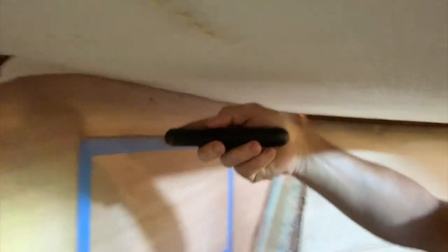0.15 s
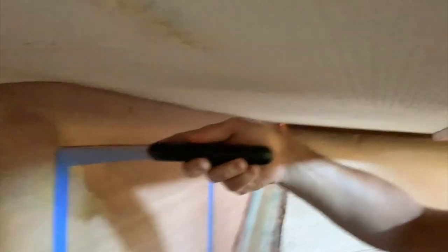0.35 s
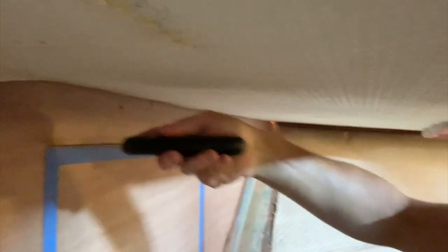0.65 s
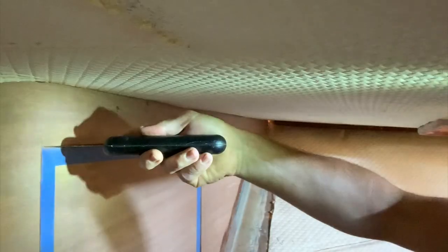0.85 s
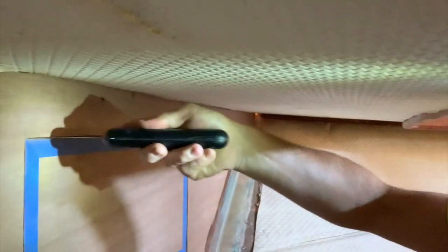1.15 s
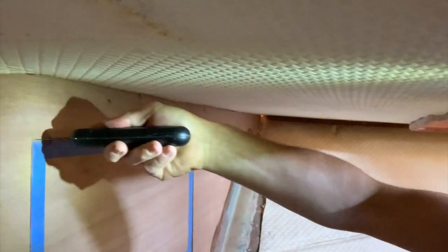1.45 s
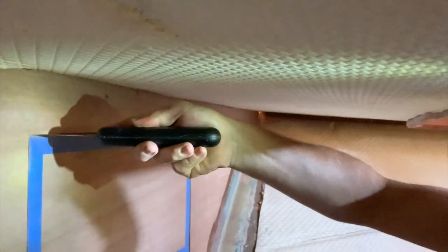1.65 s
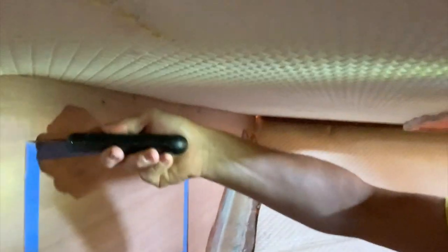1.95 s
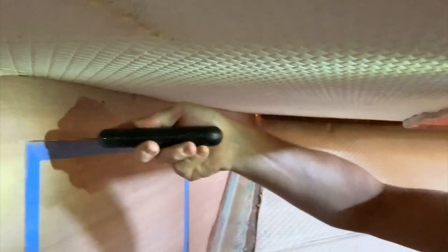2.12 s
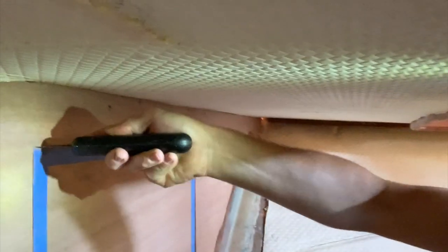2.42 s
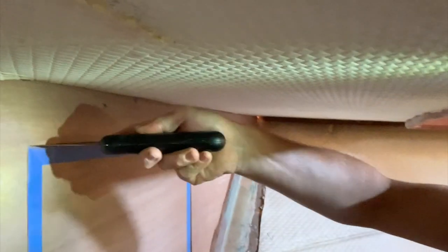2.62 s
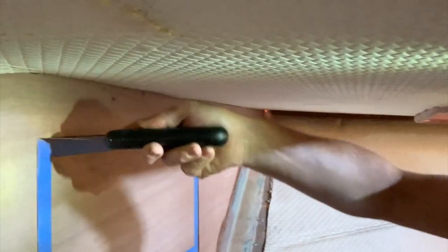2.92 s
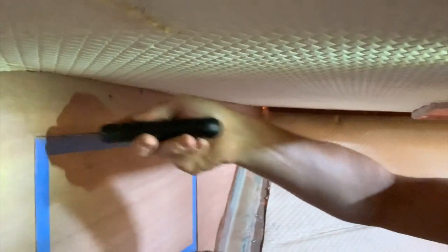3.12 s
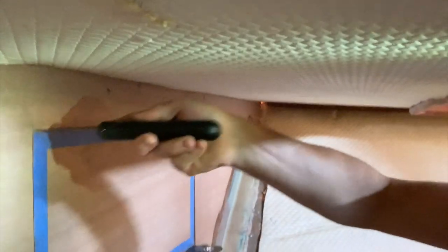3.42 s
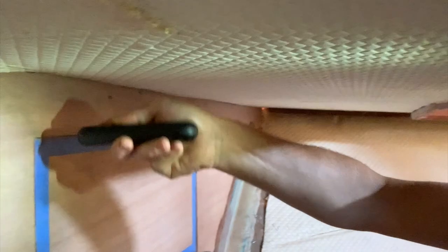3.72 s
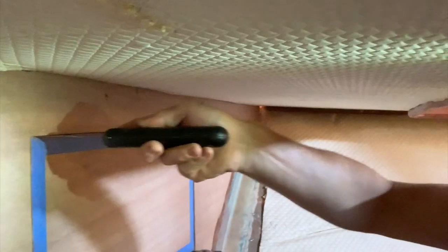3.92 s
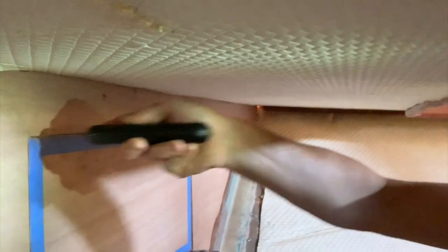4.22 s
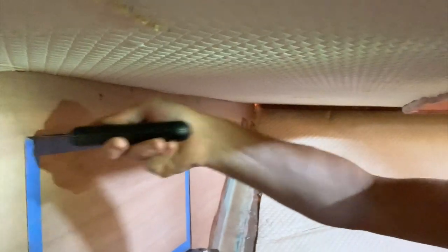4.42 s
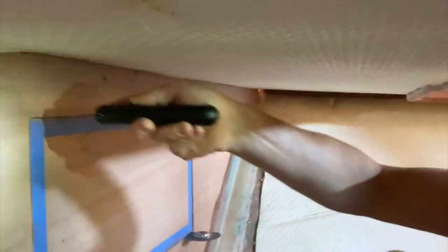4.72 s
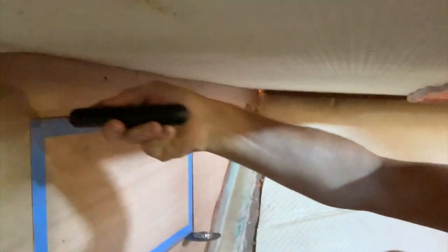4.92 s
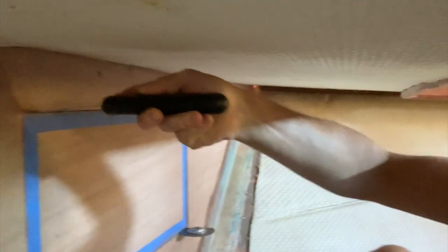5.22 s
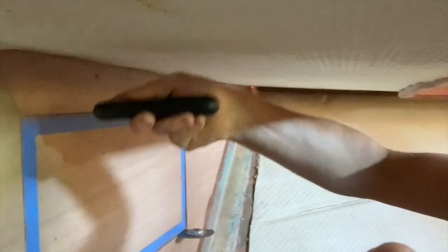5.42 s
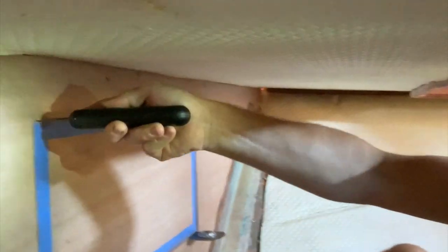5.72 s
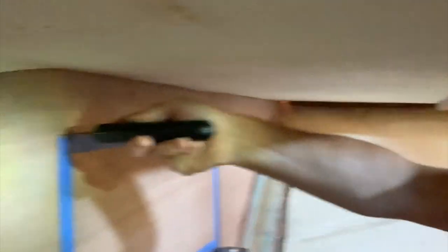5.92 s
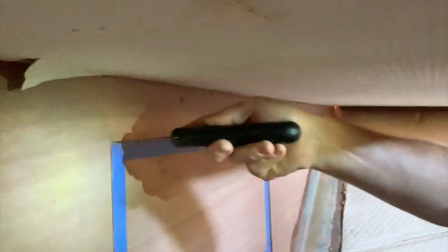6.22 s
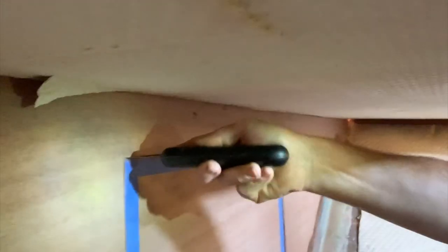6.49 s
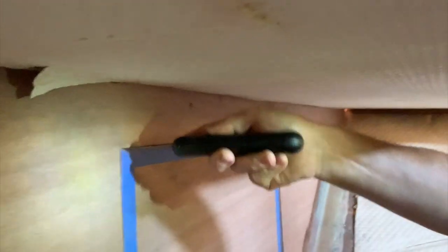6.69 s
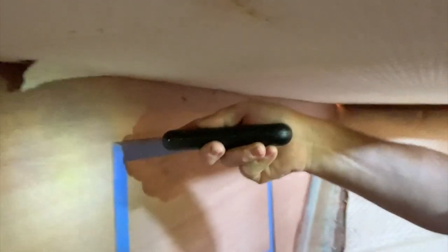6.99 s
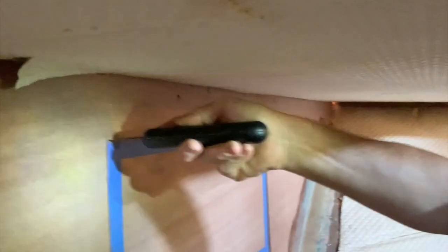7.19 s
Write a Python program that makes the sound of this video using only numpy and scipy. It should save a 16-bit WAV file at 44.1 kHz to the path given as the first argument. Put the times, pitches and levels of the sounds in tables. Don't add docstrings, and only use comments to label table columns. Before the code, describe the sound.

In a small, boxy boat cabin, a fine-toothed pull saw cuts a thick wooden bulkhead close to the microphone. Soft hesitant strokes quicken into strong, regular rasps, each with a hollow woody boom and a dry hiss. A sharp tick marks a short pause, then faster sawing, another quiet pause, and steady strokes to the end.

```python
import sys
import numpy as np
from scipy import signal
from scipy.fft import rfft, irfft, next_fast_len
from scipy.io import wavfile
from scipy.ndimage import uniform_filter1d

SR = 44100
rng = np.random.default_rng(int(sys.argv[2]) if len(sys.argv) > 2 else 0)


def inscribe(sig):
    pcm = np.round(np.clip(np.atleast_2d(sig).T, -1, 1) * 32767)
    wavfile.write(sys.argv[1], SR, pcm.astype(np.int16))


def nominal_scale(level):
    x = np.asarray(level, float) / 20
    return 10 ** x


N = 324135
HZ = np.fft.rfftfreq(next_fast_len(N + SR), 1 / SR) + 1e-3


def rms_one(x):
    return x / np.sqrt(np.mean(x ** 2) + 1e-20)


def through(x, response):
    size = 2 * (len(HZ) - 1)
    return irfft(rfft(x, size) * response, size)[:N]


def modes(table):
    total = 0
    for k, (hz, width, db) in enumerate(table):
        damping = 1j * HZ * width
        total = total + (-1) ** k * nominal_scale(db) * damping / (hz ** 2 - HZ ** 2 + damping)
    return total


def colour(points):
    hz, db = np.transpose(points)
    cep = irfft(np.log(nominal_scale(np.interp(np.log(HZ), np.log(hz), db))))
    half = len(cep) // 2
    cep[1:half] *= 2
    cep[half + 1:] = 0
    return np.exp(rfft(cep))


def drift(rate):
    r = np.exp(-2 * np.pi * rate / SR)
    wander = signal.lfilter([1], [1, -2 * r, r * r], rng.standard_normal(N + SR))
    return rms_one(wander[SR:])


def held(x, level_db, span_s):
    size = max(int(span_s * SR), 64)
    power = uniform_filter1d(uniform_filter1d(x ** 2, size), size)
    return x * nominal_scale(level_db) / np.sqrt(power + 1e-14)


def grains(per_s, spread_db):
    sizes = nominal_scale(spread_db * np.minimum(rng.exponential(1, N), 5)) * rng.choice([-1, 1], N)
    return rms_one(sizes * (rng.random(N) < per_s / SR))


def cabin():
    t60_s, echoes_db = 0.14, 6
    lags = rng.uniform(.007, .03, 20)
    echoes = 0
    for k, lag in enumerate(lags):
        loop = nominal_scale(-60 * lag / t60_s) * np.exp(-2j * np.pi * HZ * lag)
        echoes = echoes + (-1) ** k * loop / (1 - loop)
    return 1 + nominal_scale(echoes_db) * echoes / np.sqrt(len(lags))


def cabin_floor():
    # frequency in Hz, density in dB per Hz
    floor_colour = [(76, -22), (130, -1), (194, 3), (340, -7), (632, -21), (1380, -33), (2470, -37),
                    (15600, -59)]
    return nominal_scale(-50) * rms_one(through(rng.standard_normal(N), colour(floor_colour)))


def jolts(boom_db):
    # centre of the jolt in seconds, level in dB
    arm_jolts = [(.14, -31), (.26, -28), (.59, -29.5), (0.799, -27.5), (1.08, -31), (1.311, -34),
                 (1.559, -23), (1.681, -24), (1.79, -26), (2.27, -28), (2.6, -33), (2.679, -27),
                 (2.76, -26.5), (3.07, -25), (3.321, -31), (3.53, -23.5), (3.721, -24.5), (3.93, -21),
                 (4.35, -26), (5.1, -23.5), (5.3, -31), (5.45, -28.5), (5.6, -22), (5.82, -24),
                 (6.28, -28.5), (6.47, -39), (6.57, -36), (6.88, -30), (7.25, -26)]
    swell_s, rest_db, under_boom_db = 0.034, -39, -14.5
    t = np.arange(N) / SR
    swells = sum(nominal_scale(db) ** 2 * np.exp(-((t - s) / swell_s) ** 2) for s, db in arm_jolts)
    return 10 * np.log10(swells + nominal_scale(rest_db) ** 2 + nominal_scale(boom_db + under_boom_db) ** 2)


def hull(hum_db):
    # mode in Hz, width in Hz, level in dB
    hull_modes = [(43.4, 11.9, -0.5), (52.7, 15.2, 2.5), (65.3, 17.9, -8.5)]
    low_cut = HZ ** 2 / (HZ ** 2 + 36 ** 2)
    push = rng.standard_normal(N) * nominal_scale(hum_db)
    return held(through(push, modes(hull_modes) * low_cut), hum_db, span_s=0.044)


def ticks(room):
    # start in seconds, peak in dB, rattle t60 in seconds, top frequency in Hz (low is a soft contact)
    contacts = [(.091, -38, 0.12, 1500), (.42, -49, .1, 5000), (1.3214, -36, 0.086, 4000),
                (2.7255, -27, .12, 3502), (2.842, -18, 0.16, 15000), (2.937, -37, .1, 3020),
                (3.011, -29, 0.12, 5000), (5.207, -59, 0.029, 19000), (5.2892, -68, 0.094, 7990),
                (5.41, -52, 0.14, 5000), (5.4212, -54, .12, 3992), (5.9437, -86, 0.067, 3944)]
    # frequency in Hz, density in dB per Hz
    contact_colour = [(300, -44), (700, -10), (1500, -8), (2500, -4.5), (4000, -11), (7000, -11.5),
                      (12500, -14), (15600, -16)]
    out, t = np.zeros(N + SR), np.arange(SR // 4) / SR
    for s, db, t60, top_hz in contacts:
        crack = nominal_scale(-60 * t / 0.0053)
        burst = nominal_scale(-2.5 - 60 * t / 0.033)
        rattle = nominal_scale(-12.0 - 60 * t / t60)
        noise = rng.standard_normal(len(t)) * (crack + burst + rattle)
        softened = signal.sosfilt(signal.butter(1, top_hz, fs=SR, output="sos"), noise)
        first = round(s * SR)
        out[first:first + len(t)] += nominal_scale(db - 2.0) * softened
    return through(out[:N], colour(contact_colour) * (1 + nominal_scale(-6.5) * (room - 1)))


def strokes():
    # bite in seconds, time to full speed in seconds,
    # panel boom in dB, fibre hiss in dB, top tooth rate in Hz
    first_strokes = [(.122, .02, -33.5, -44, 115), (.2, .025, -23, -38, 166.7),
                     (0.527, 0.09, -31, -48.5, 134), (0.678, 0.094, -28, -50, 134.8),
                     (.94, .04, -33, -47.5, 130), (1.01, 0.033, -26, -43, 202.8),
                     (1.195, 0.061, -21.5, -42, 300.4), (1.33, .06, -17.5, -41.5, 190),
                     (1.527, 0.066, -14.5, -31, 170.2), (1.755, 0.067, -17, -40, 213.3),
                     (2.015, 0.0637, -16, -32.5, 223.1), (2.232, .15, -16.5, -38.5, 241.3),
                     (2.503, .05, -15.5, -31.5, 261.4), (2.728, .015, -30.5, -52, 112)]
    middle_strokes = [(3.011, .03, -25, -52, 118.7), (3.16, .04, -17.5, -37.5, 305.1),
                      (3.377, .08, -18.5, -33.5, 240), (3.587, 0.058, -18, -36.5, 221.1),
                      (3.79, 0.053, -17.5, -32, 238.3), (4.005, 0.0992, -18, -32.5, 270.5),
                      (4.21, 0.052, -15.5, -31, 335.6), (4.411, 0.03464, -14.5, -33.5, 362.2),
                      (4.592, 0.052, -14.5, -31.5, 218.7), (4.789, 0.048, -17.5, -35.5, 208),
                      (4.99, 0.043, -19, -31, 216.9)]
    last_strokes = [
        (5.425, 0.086, -23.5, -43.5, 225.2),
        (5.599, .06, -21, -43.5, 187.6),
        (5.955, 0.0697, -20, -40.5, 200),
        (6.272, 0.059, -19, -39.5, 250.1),
        (6.547, 0.055, -15, -37.5, 188.7),
        (6.761, 0.04, -18, -38, 237.1),
        (6.95, 0.053, -16, -36, 235),
        (7.159, 0.031, -17, -38.5, 213.1),
        (7.332, 0.033, -17.5, -37.5, 196.6),
    ]
    # stop in seconds, braking time in seconds, panel boom in dB
    stops = [(0, .05, -44), (.34, .14, -57), (.885, .11, -37), (1.129, .08, -33.5), (1.505, .055, -32),
             (1.722, .085, -50), (1.97, .09, -40), (2.465, .07, -32), (2.7, .1, -36), (2.84, .13, -48),
             (3.111, .07, -36), (3.971, .1, -36), (4.38, .07, -32), (4.565, .09, -40), (4.752, .08, -32),
             (4.957, .085, -36), (5.22, .14, -48), (5.915, .14, -46), (6.232, .08, -36), (6.522, .11, -38),
             (6.722, .08, -32), (6.922, .085, -38)]
    glides = [.2, .68, 1.01, 1.33, 5.6]
    eased_bites = [.94, 1.195, 2.232, 3.16, 4.005, 4.21, 4.789, 4.99, 5.425, 5.955, 6.272]
    lead_s, shortest_creep_s, longest_creep_s = .008, .02, .05
    bite_s, eased_bite_s, usual_brake_s = 0.015, .035, .085
    creep_speed, bite_speed, glide_in_speed, glide_out_speed = .3, .65, .85, .85
    rows, t = np.array(first_strokes + middle_strokes + last_strokes), np.arange(N) / SR
    stop, braking, nudge_db = np.transpose(stops)

    bite = rows[:, 0] - lead_s
    rest_s = bite - stop[np.clip(np.searchsorted(stop, bite) - 1, 0, None)]
    short_rest = rest_s < .1
    creep_s = np.where(short_rest, np.clip(rest_s, shortest_creep_s, longest_creep_s), shortest_creep_s)
    start = bite - creep_s
    turn = np.append(start[1:], start[-1] + .2)

    next_stop = np.clip(np.searchsorted(stop, bite + .03), 0, len(stop) - 1)
    early = (stop[next_stop] > start) & (stop[next_stop] < turn + .01)
    end = np.where(early, stop[next_stop], turn)
    brake_s = np.where(early, braking[next_stop], usual_brake_s)
    glides_in = np.abs(rows[:, :1] - glides).min(axis=1) < .02
    eased = np.abs(rows[:, :1] - eased_bites).min(axis=1) < .02
    glides_out = np.append(glides_in[1:], False)

    k = np.clip(np.searchsorted(start, t) - 1, 0, None)
    age, left = t - bite[k], end[k] - t
    rise = np.clip(rows[k, 1], .005, None)

    grip = np.clip(.5 + age / np.where(eased, eased_bite_s, bite_s)[k], 0, 1)
    creep = creep_speed * np.clip(1 + age / creep_s[k], 0, 1) + (1 - creep_speed) * grip
    entry_speed = np.where(glides_in[k], glide_in_speed, bite_speed)
    up = 1 - (1 - entry_speed) * np.clip(1 - age / rise, 0, 1) ** .9
    up = up * np.where(glides_in[k], 1, creep)
    brake = np.clip(left / brake_s[k], 0, 1) ** .8
    brake = np.where(glides_out[k], glide_out_speed + (1 - glide_out_speed) * brake, brake)
    sag = 1 - .3 * np.clip((age - rise) / (age + left - rise), 0, 1)

    resting = (left < 0) | ((age < 0) & short_rest[k]) | (t < start[0])
    nudge = nominal_scale(nudge_db[np.clip(np.searchsorted(stop, t) - 1, 0, None)]) * resting
    rest_db = 20 * np.log10(uniform_filter1d(nudge, size=1000) + nominal_scale(-67))
    speed = np.clip(up * sag * brake, 0, 1)
    progress = np.clip(age / (age + left), 0, 1)
    return speed, progress, rows[k].T, rest_db


def follow(speed, full_db, power, ring, tail_s, rest_db):
    r = np.exp(-1 / (tail_s * SR + 1))
    energy = (nominal_scale(full_db) * speed ** power) ** 2
    ringing = signal.lfilter([1 - r], [1, -r], energy)
    return 10 * np.log10((1 - ring) * energy + ring * ringing + nominal_scale(rest_db) ** 2)


def tooth_phase(rate_hz, jitter):
    return 2 * np.pi * np.cumsum(rate_hz * np.exp(jitter * drift(38.84))) / SR


def panel(phase, boom_db, steep_db):
    # mode in Hz, width in Hz, level in dB
    panel_modes = [(103, 40.1, -2), (122.6, 32.3, -1), (154.9, 14, -11.5), (181.85, 8.44, -1.5),
                   (227.1, 8.2, -2), (287.9, 20, -8), (334.2, 8.2, -1.5), (386.4, 15, -3.5),
                   (408.3, 45, -13)]
    split_hz = 265
    tooth = nominal_scale(5.45 * drift(68.0)) * (np.cos(phase) + 0.37 * np.cos(2 * phase))
    rubbing = nominal_scale(12.5) * grains(1500, spread_db=-1.5)
    force = (rms_one(tooth) + rubbing) * nominal_scale(0.34 * boom_db)
    slowing_db = 0.35 * np.minimum(boom_db + 32.0, 0)
    steep = nominal_scale(steep_db + slowing_db)
    lower = through(force, modes([m for m in panel_modes if m[0] < split_hz]))
    upper = through(force * steep, modes([m for m in panel_modes if m[0] >= split_hz]))
    return held(lower - upper, boom_db, span_s=0.054)


def kerf(phase, rasp_db):
    # mode in Hz, width in Hz, level in dB
    kerf_modes = [(491.7, 18.2, 1.5), (537.6, 8.3, 3), (613.4, 25.3, 2), (684, 11, -2), (735, 38.5, -6.5),
                  (801.6, 10.8, -3), (850.4, 12, -4), (1052.6, 21.2, -7), (1122, 13.6, -6.5),
                  (1258.6, 14.2, -8.5), (1476.6, 17.2, -11.5)]
    chips = grains(2500, spread_db=2.0) * (1 + 0.17 * np.cos(phase))
    tone = nominal_scale(-17.0 + 3.15 * drift(18.0)) * np.cos(2 * phase)
    force = (chips + tone) * nominal_scale(1.16 * rasp_db)
    return held(through(force, modes(kerf_modes)), rasp_db, span_s=0.035)


def patches(x, patchy_db, rate):
    centres = np.geomspace(900, 16000, 30)
    place = np.interp(np.log(HZ), np.log(centres), np.arange(len(centres)))
    out = 0
    for k in range(len(centres)):
        band = np.clip(1 - np.abs(place - k), 0, 1)
        out = out + nominal_scale(patchy_db * drift(rate)) * through(x, band)
    return out


def fibres(phase, hiss_db, room):
    # frequency in Hz, density in dB per Hz
    fibre_colour = [(760, -7.5), (1300, -0.5), (1580, -5), (1810, -4.5), (2480, -3.5), (3380, -12.5),
                    (4520, -13.5), (5800, -21), (12600, -17), (15600, -34)]
    # mode in Hz, width in Hz, level in dB over the hiss
    blade_modes = [(1743, 20, 3.5), (1875, 16, 11), (2155, 54, -2.5), (2510, 24, 7), (2925, 250, -4.5),
                   (2842, 50, 2), (3755, 58, -1), (3700, 19, -4), (4600, 23, 1.5), (5930, 37, -28),
                   (7800, 83, -6), (10400, 100, -30), (13300, 210, -8)]
    # time in seconds, treble lift in dB
    sheen = [(0, 3), (1.15, -2), (1.3, -0.3), (2.68, -13.5), (2.75, -12), (3.1, -5.5), (3.2, -1.5),
             (5.15, -10), (5.9, -7.2), (7.35, -3)]
    snaps = grains(7000, spread_db=2.0) * (1 + 0.03 * np.cos(phase)) * nominal_scale(3.2 * drift(30.0))
    hiss = through(snaps * nominal_scale(0.07 * hiss_db), colour(fibre_colour) * (1 + modes(blade_modes)) * room)
    hiss = patches(hiss, patchy_db=2.0, rate=3.5)
    top = signal.sosfilt(signal.butter(2, 4800, "high", fs=SR, output="sos"), hiss)
    lift_db = np.interp(np.arange(N) / SR, *np.transpose(sheen))
    lift_db = lift_db + 0.1 * np.minimum(hiss_db + 85, 0)
    return held(hiss + (nominal_scale(lift_db) - 1) * top, hiss_db, span_s=0.0043)


def creaks():
    # start in seconds, length in seconds, resonance in Hz, width in Hz, level in dB
    rubs = [
        (0.48, .11, 1294, 50, -59),
        (0.82, 0.22, 2150, 110, -65),
        (.884, 0.09, 1070, 190, -53),
        (.86, .22, 1500, 70, -69),
        (2.88, 0.11, 4900, 142, -75),
        (5.275, 0.059, 4150, 156, -106),
        (5.27, 0.061, 1600, 900, -63),
        (0.53, 0.032, 1200, 2700, -57),
    ]
    out, t, rub = np.zeros(N), np.arange(N) / SR, rng.standard_normal(N)
    for s, length, hz, width, db in rubs:
        age = np.clip((t - s) / length, 0, 1)
        swell = np.sin(np.pi * np.sqrt(age))
        out += nominal_scale(db) * swell * rms_one(through(rub, modes([(hz, width, 0)]) ** 2))
    return out


def scene():
    # time in seconds, upper-mode lift in dB
    tilt = [(.2, -1), (.8, 2), (1.05, 4), (1.25, 0), (1.45, -2), (1.85, 2), (2.5, 0), (3.2, -1), (3.6, -2),
            (3.95, 1), (4.15, 1), (4.7, 0), (5.05, 1), (5.5, 3), (5.72, 0), (6.05, 4), (6.4, -3), (7.05, 2)]
    speed, progress, (_, _, boom, hiss, top_hz), rest_db = strokes()
    boom, hiss = uniform_filter1d([boom, hiss], size=1300)
    rasp = .7 * boom + .45 * hiss + .3
    boom_db = follow(speed, boom, power=1, ring=0.46, tail_s=0.026, rest_db=rest_db)
    rasp_db = follow(speed, rasp, power=2.62, ring=0.4, tail_s=0.019, rest_db=rest_db - 23)
    hiss_db = follow(speed, hiss, power=2.47, ring=0.095, tail_s=0.016, rest_db=rest_db - 36)

    slow_hz = 101.36
    rate_hz = uniform_filter1d(slow_hz + (top_hz - slow_hz) * speed ** 1.1, size=400)
    steep_db = 3.5 * np.log2(rate_hz / 190) + 4 * uniform_filter1d(.5 - progress, size=800)
    steep_db = steep_db + np.interp(np.arange(N) / SR, *np.transpose(tilt))

    phase, room = tooth_phase(rate_hz, jitter=0.13), cabin()
    saw = panel(phase, boom_db, steep_db) + kerf(phase, rasp_db) + fibres(phase, hiss_db, room)
    return (cabin_floor() + hull(jolts(boom_db)) + ticks(room) + saw + creaks())[None]


def low_pass(x):
    return signal.sosfilt(signal.butter(12, 15710, fs=SR, output="sos"), x)


def record(dry):
    mix = 0.81 * np.tanh(dry / 0.8)
    return low_pass(mix)


dry = scene()
out = record(dry)
inscribe(out)
```